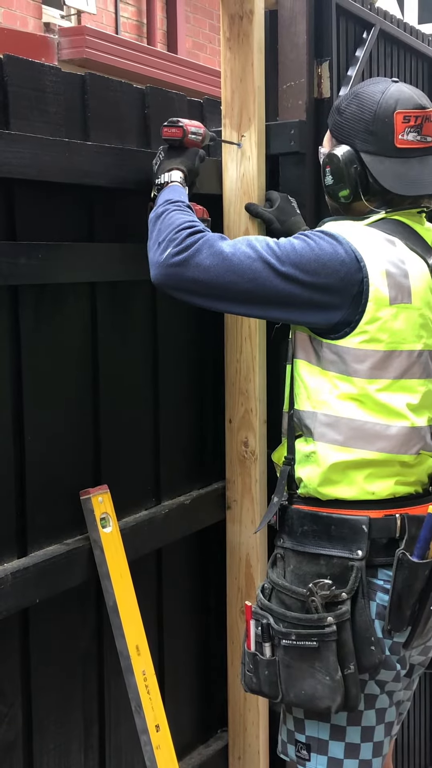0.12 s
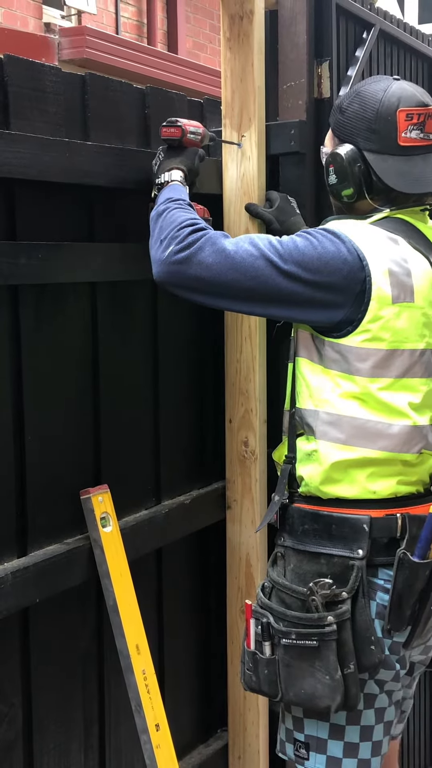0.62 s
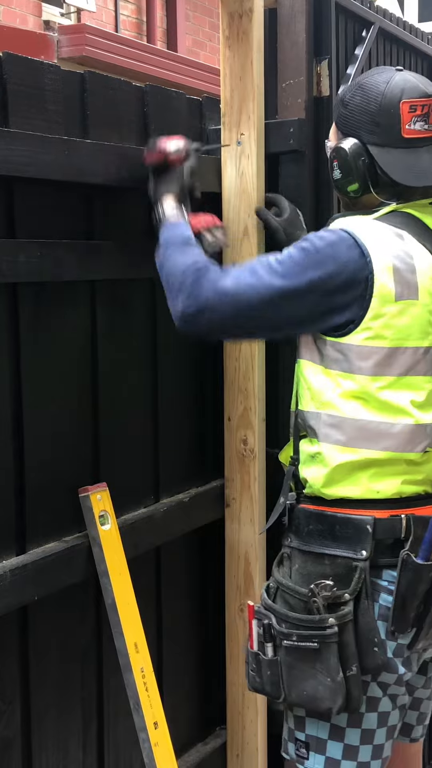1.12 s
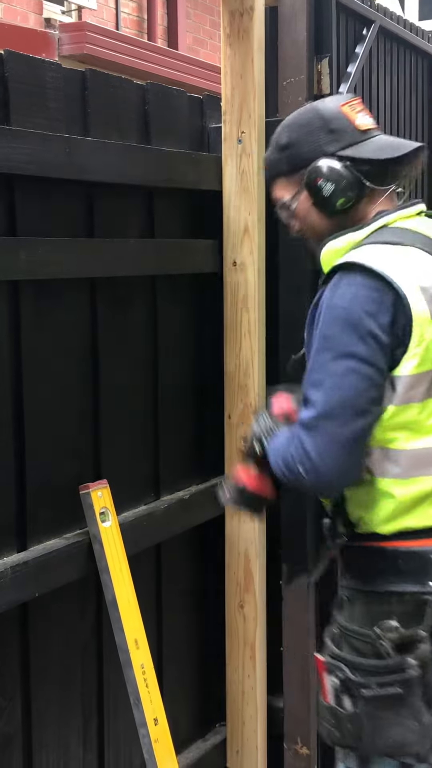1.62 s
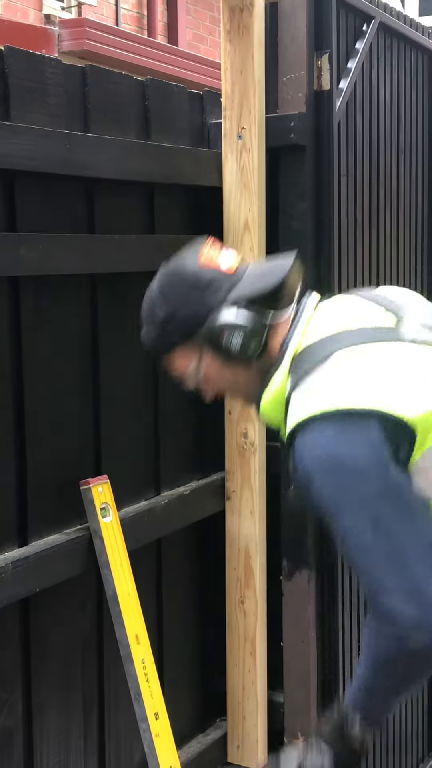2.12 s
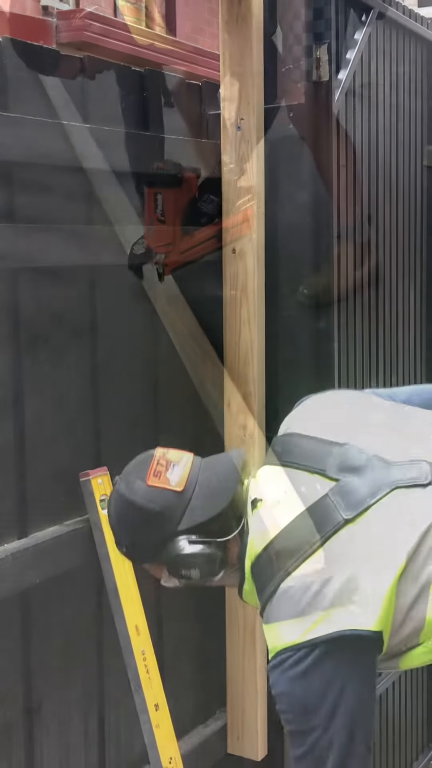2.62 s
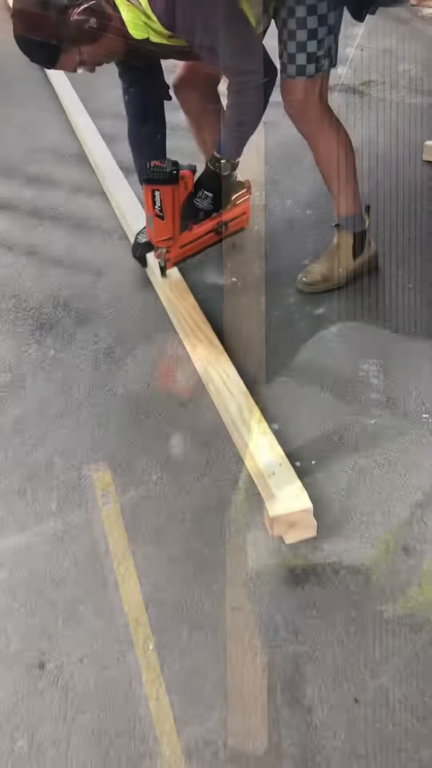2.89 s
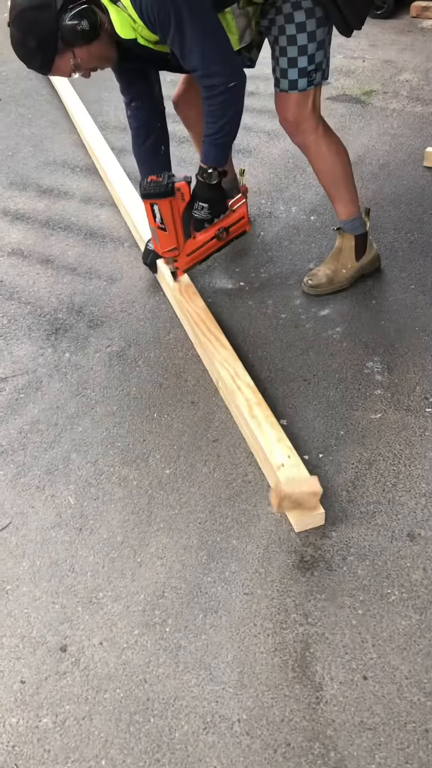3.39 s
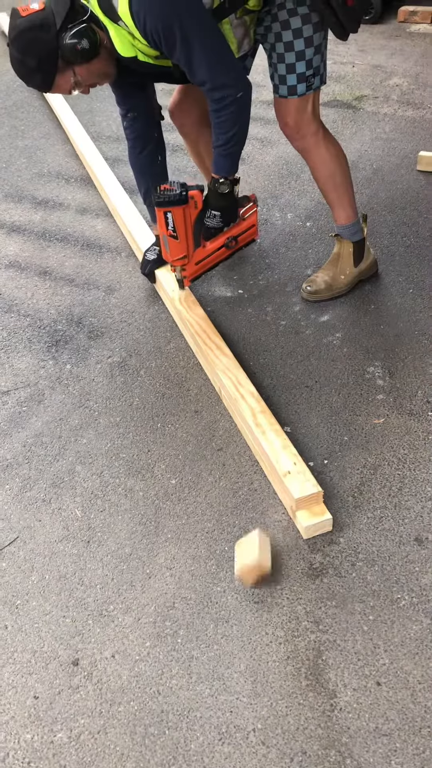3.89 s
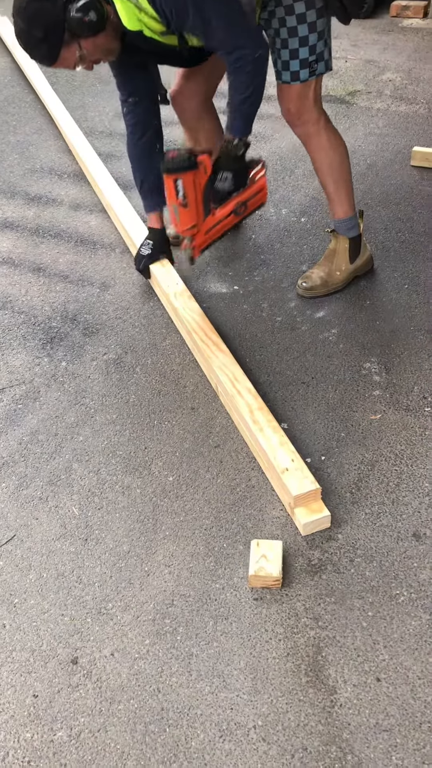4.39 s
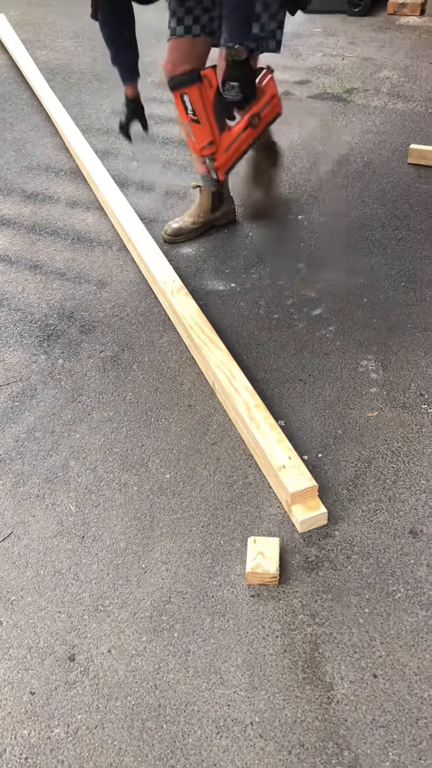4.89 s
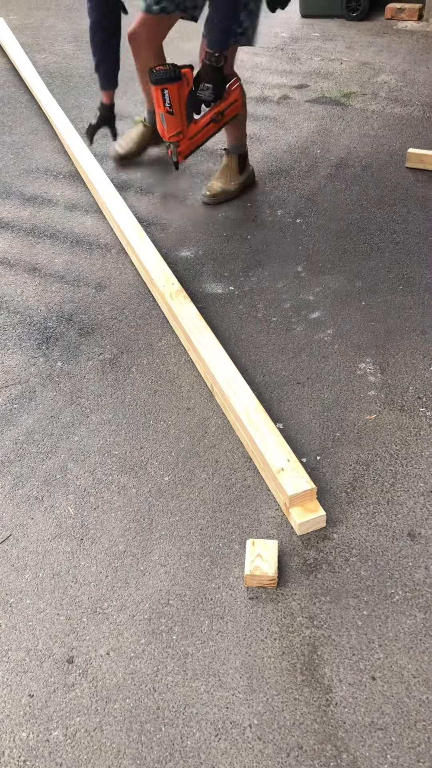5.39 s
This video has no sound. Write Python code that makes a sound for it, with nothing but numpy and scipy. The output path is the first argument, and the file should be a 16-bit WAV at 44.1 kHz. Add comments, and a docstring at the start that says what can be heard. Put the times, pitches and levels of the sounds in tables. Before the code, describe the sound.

An impact driver hammers a screw into a fence post and stops; after quiet rustling, a nail gun cracks twice into timber in an echoing yard.

```python
"""In a walled yard, an impact driver hammers a screw into a fence post and stops; wind buffets the microphone.
Tools and clothes click and rustle, then a gas nailer, its fan humming, fires twice into timber on
concrete and an offcut tumbles off. Blows are shaped noise and dying tones, the post is tones at multiples
of the blow rate, air and wind are colored noise. The yard adds echoes and a limiter flattens the shots."""
import sys
import numpy as np
from scipy import signal
from scipy.fft import rfft, irfft
from scipy.io import wavfile
from scipy.ndimage import uniform_filter1d

SR = 44100
rng = np.random.default_rng(int(sys.argv[2]) if len(sys.argv) > 2 else 0)


def store_pcm(level_fs):
    """Save levels as 16-bit WAV."""
    pcm = np.round(np.clip(level_fs, -1, 1) * 32767).astype(np.int16)
    wavfile.write(sys.argv[1], SR, np.atleast_2d(pcm).T)


def ratio_of_db(decibels):
    """Turn decibels (scalar or array-like) into linear amplitude factors; 0 dB maps to 1."""
    return 10 ** (np.asarray(decibels, float) / 20)


N = 243500  # length in samples

# Color of the quiet yard. Each row: frequency in Hz, relative level in dB per Hz.
AIR_COLOR = [(88, -44), (150, -3.5), (190, 0.5), (235, -4.5), (297, -0.5), (483, -8.5), (660, -7.5),
             (1380, -14), (1750, -19), (3590, -24), (15800, -37.5)]
AIR_DB = -62
# Strength of the wind on the microphone. Each row: time in seconds, level in dB.
WIND_LEVEL = [(0.0, -48), (0.17, -53), (0.28, -36), (0.38, -49.5), (0.43, -37), (0.52, -54.5), (1.77, -59),
              (2.89, -51.5), (2.94, -35.5), (3.01, -44.5), (3.2, -37), (3.34, -39), (3.55, -46),
              (3.89, -48), (4.44, -38.5), (4.54, -42.5), (4.58, -27), (4.72, -31.5), (4.8, -36.5),
              (5.03, -39.5), (5.52, -56)]
# Color of the wind's rumble. Each row: frequency in Hz, relative level in dB per Hz.
RUMBLE_COLOR = [(15, -43), (28, -15.5), (50, 4.5), (82, -2.5), (216, -21), (356, -36.5), (400, -37),
                (520, -56), (880, -120)]
# Color of the rough, higher flutter in strong gusts. Each row: frequency in Hz, relative level in dB per Hz.
FLUTTER_COLOR = [(40, -45.5), (90, 7.5), (150, -13), (300, -19), (600, -74.5)]
# Flutter level at the strongest gust, and dB it changes for each dB of wind.
FLUTTER_DB, FLUTTER_GROWTH = -27.5, 1.82
# How long the yard's echoes last. Each row: frequency in Hz, time to fall by 60 dB in seconds.
YARD_DECAY = [(200, 0.84), (1400, 0.59), (3700, 0.6), (9700, 0.26)]

# Strength of the nailer's fan. Each row: time in seconds, level in dB.
FAN_LEVEL = [(2.5, -55.5), (2.75, -53.5), (3, -57), (3.15, -62), (3.3, -61.5), (4.1, -68), (4.5, -61.5),
             (5, -57.5), (5.52, -56.5)]
# Color of the fan's air noise. Each row: frequency in Hz, relative level in dB per Hz.
FAN_AIR_COLOR = [(200, 3), (320, -7), (440, -0.5), (650, 1.5), (820, -5), (1400, -2), (2200, -7),
                 (2800, -16), (3750, -15.5), (4600, -16.5), (5200, -23), (9500, -29.5), (11000, -57.5)]
# Tones of fan blades and motor. Each row: frequency in Hz, level in dB relative to the air noise.
FAN_TONES = [(662, -8.5), (1324, -11), (1653, -17.5), (1960, -17), (3720, -23)]

# Cloth and boots. Each row: start in seconds, level in dB, length in seconds, center in Hz.
RUSTLES = [(1.545, -70.5, .057, 5000), (2.064, -67.5, 0.13, 4440), (2.157, -66.5, 0.066, 4200),
           (2.336, -65, 0.087, 6170), (3.016, -62, 0.085, 4500), (3.992, -70.5, 0.037, 5030)]
# Small metal parts. Each row: start in seconds, level in dB before a fixed cut, pitch in Hz.
PINGS = [(2.006, -49, 2540), (2.751, -40.5, 3420), (2.935, -50, 8900), (2.935, -54, 11700),
         (3.697, -53, 3520), (3.712, -41, 3330), (4.084, -43, 4940)]
PING_T60, PING_BEAT = 0.05, 0.03  # seconds to fall by 60 dB; share by which the two tones differ
# Plastic and grit. Each row: start in seconds, relative level in dB, center in Hz, seconds to fall by 60 dB.
CLICKS = [(.755, -30, 6030, 0.056), (2.003, -53.5, 7950, 0.043), (2.75, -45, 10000, 0.02),
          (2.754, -46, 7000, 0.02), (2.901, -52, 9000, 0.018), (3.006, -51, 9000, 0.024),
          (3.022, -43, 1290, .03), (3.021, -51.5, 8500, 0.048), (3.34, -41, 3500, .02),
          (3.349, -35, 1400, 0.045), (3.521, -33, 11100, .05), (3.694, -51, 9900, .046),
          (3.786, -50, 3510, 0.023), (3.885, -47, 6840, 0.045), (4.3178, -22, 12500, .032),
          (5.177, -43, 10130, 0.087), (5.194, -47, 12100, .04), (5.379, -52, 3930, 0.072)]
CLICK_SPREAD = 1.1  # filter width as a share of the center
# Ticks of the trigger. Each row: start in seconds, level in dB.
TRIGGER_TICKS = [(4.083, -23), (4.086, -33), (4.092, -30.5), (4.1, -31)]
TRIGGER_HZ, TRIGGER_T60 = 1860, 0.004
# Wood on wood and concrete, and in the first two rows the driver's last blows seating the screw. Each row:
# start in seconds, level in dB, pitch in Hz, seconds to fall by 60 dB.
KNOCKS = [(.730, -36, 690, 0.026), (0.756, -34, 462, 0.037), (3.5214, -20, 477, 0.0094),
          (3.909, -38.5, 1010, 0.012), (3.926, -47, 1160, 0.015), (4.311, -16.5, 476, 0.0068),
          (5.18, -37.5, 600, 0.026), (5.198, -42, 800, 0.03)]
BOUNCE_S, BOUNCE_DB = 0.0034, 1  # a knocked piece lands again: delay, and level relative to the first

# Natural tones of post and fence. Each row: frequency in Hz, relative level in dB.
POST_MODES = [(85, -11), (165, -2), (211, 3.5), (338, -5.5), (590, -4.5), (720, -6), (846, -4), (931, 3.5),
              (1092, 6.5), (1185, 3), (1262, 3)]
POST_DB, POST_T60, POST_WIDTH_HZ = -42, 0.41, 17.8
# Resonances of anvil and case. Each row: frequency in Hz, filter width in Hz, relative level in dB.
ANVIL_MODES = [(1150, 100, 0), (2010, 95, -6), (2322, 125, -2.5), (2670, 120, -8.5), (3066, 140, -10.5),
               (3514, 230, -3), (3844, 68, -5.5), (5360, 2800, -3), (7300, 140, -5.5), (8210, 1640, 1.5)]
# Color of motor and gear noise. Each row: frequency in Hz, relative level in dB per Hz.
GEAR_COLOR = [(88, -26), (150, -8), (213, -8), (398, -16.5), (1080, 4), (1790, -2.5), (8230, -10.5),
              (16000, -18.5)]
# Load on the driver, which is off after the last row. Each row: time in seconds, gain in dB.
DRIVER_LOAD = [(0, -41), (.77, -42), (.83, -52)]
BLOWS_PER_S, FIRST_S, LAST_S = 42.32, 0.0006, 0.7565  # blow rate, first and last blow in seconds

# Nailer shots. Each row: start in seconds, strength in dB.
SHOTS = [(3.3601, -8.5), (4.1090, -10)]
# Parts of a shot. Each row: dB relative to its strength, center in Hz, filter width in Hz,
# seconds to fall by 60 dB.
SHOT_PARTS = [(-6, 12500, 5000, 0.034), (-15.5, 1100, 3900, 0.0694), (-12, 450, 500, 0.03),
              (-3, 2570, 5200, 0.022), (-14, 3000, 5500, .014), (-19, 14000, 5000, .02),
              (-17, 8600, 7100, 0.038)]
# Delay of each part after the start of the shot, one value per part, in seconds.
SHOT_DELAYS_S = [0, .001, .002, .0035, .0185, .081, .090]
# Nose of the nailer. Each row: frequency in Hz, dB relative to the shot, seconds to fall by 60 dB.
NOSE_MODES = [(1735, -7.5, 0.0098), (3160, -16, 0.026)]
# Whistle before the shot: pitch, final level in dB relative to the shot, length.
IGNITE_HZ, IGNITE_DB, IGNITE_S = 3110, -34, 0.01
# Boom of the struck timber as the yard returns it. Each row: frequency in Hz, relative level in dB per Hz.
BOOM_COLOR = [(59, -40.5), (100, -0.5), (481, 6.5), (1450, -3.5), (1580, 8.5), (1910, -5.5), (3120, -6),
              (6990, -19.5), (11600, -24), (16000, -102)]
SWELL_S = 0.048  # the boom builds up this long


def evened(x):
    """Scales a sound to an rms of 1."""
    return x / np.sqrt(np.mean(x ** 2) + 1e-20)


def read(points, hz):
    """Reads a frequency table along a logarithmic pitch scale."""
    f, value = np.transpose(points)
    return np.interp(np.log(hz + 1), np.log(f + 1), value)


def curve(points):
    """Reads a time table at every sample."""
    return np.interp(np.arange(N) / SR, *np.transpose(points))


def add(mix, s, sound):
    """Mixes a sound in at time s, in seconds."""
    part = mix[round(s * SR):][:len(sound)]
    part += sound[:len(part)]


def noise(points, size=N):
    """Steady noise with the color of a table and an rms of 1."""
    hz = np.fft.rfftfreq(size, 1 / SR)
    spectrum = rfft(rng.standard_normal(size)) * ratio_of_db(read(points, hz))
    return evened(irfft(spectrum, size))


def band(x, hz, width):
    """One resonance that keeps its center frequency at full strength."""
    turn = np.exp(2j * np.pi * hz * np.arange(len(x)) / SR)
    r = np.exp(-np.pi * abs(width) / SR)
    # shift the center down to zero, smooth, and shift it back
    return 2 * (turn * signal.lfilter([1 - r], [1, -r], x / turn)).real


def twice_banded(x, hz, width):
    """Two equal resonances in a row, scaled to an rms of 1."""
    return evened(band(band(x, hz, width), hz, width))


def wobble(size):
    """Smooth random drift with an rms of 1; a larger size in samples is slower."""
    return evened(uniform_filter1d(uniform_filter1d(rng.standard_normal(N), size), size))


def burst(db, hz, width, t60):
    """A puff of band noise with a quick rise and a dying tail."""
    t = np.arange(SR // 8) / SR
    puff = twice_banded(rng.standard_normal(len(t)), hz, width)
    return 0.5 * ratio_of_db(db - 60 * t / abs(t60)) * np.minimum(t / 0.00013, 1) * puff


def ring(db, hz, t60):
    """One struck tone that starts quickly and dies away."""
    t = np.arange(SR // 8) / SR
    return ratio_of_db(db - 60 * t / abs(t60)) * np.sin(2 * np.pi * hz * t) * np.minimum(t / 0.00033, 1)


def quiet_air():
    """Steady background noise of the yard, drifting very slightly in level."""
    return ratio_of_db(AIR_DB + 0.14 * wobble(size=6000)) * noise(AIR_COLOR)


def wind():
    """Low rumble in lumps, with a higher flutter that grows faster than the gusts."""
    level_db = curve(WIND_LEVEL) + 1.25 * wobble(size=500)
    flutter_db = FLUTTER_DB + FLUTTER_GROWTH * (level_db - level_db.max())
    return ratio_of_db(level_db) * noise(RUMBLE_COLOR) + ratio_of_db(flutter_db) * noise(FLUTTER_COLOR)


def yard(x):
    """Diffuse echoes: the power of each band lingers and dies at its own speed, with ever new phases."""
    hz, t, z = signal.stft(x, SR, nperseg=256, noverlap=192)
    power = uniform_filter1d(abs(z) ** 2, size=5, axis=0)
    keep = ratio_of_db(-2 * 60 * t[1] / read(YARD_DECAY, hz))  # share of power left after one step
    # the first echo needs a few milliseconds to come back
    lingering = np.array([signal.lfilter([0, 0, 0, 1 - r], [1, -r], p) for r, p in zip(keep, power)])
    chance = rng.standard_normal(z.shape[::-1] + (2,)).T
    echoes = np.sqrt(abs(lingering)) * (chance[0] + 1j * chance[1])
    return signal.istft(echoes, SR, nperseg=256, noverlap=192)[1][:N]


def fan():
    """The nailer's fan: air noise, wavering tones, and narrow noise from air chopped by the blades."""
    t = np.arange(N) / SR
    drift = np.cumsum(1 + 0.00573 * wobble(size=1500)) / SR  # time that runs a little fast or slow
    tones = np.zeros(N)
    for hz, db in FAN_TONES:
        tones += ratio_of_db(db + 2.2 * wobble(size=1200)) * np.sin(2 * np.pi * hz * drift)
        tones += ratio_of_db(db - 5.5) * evened(band(rng.standard_normal(N), hz, 90.0))
    switch_on = np.clip((t - FAN_LEVEL[0][0]) / 0.0043, 0, 1)
    return ratio_of_db(curve(FAN_LEVEL)) * (noise(FAN_AIR_COLOR) + tones) * switch_on


def rustles():
    """Cloth and boots rub: band noise that swells and fades."""
    out = np.zeros(N)
    for s, db, length, hz in RUSTLES:
        grains = rng.standard_normal(round(length * SR))
        add(out, s, ratio_of_db(db) * evened(band(grains, hz, 0.39 * hz)) * np.hanning(len(grains)))
    return out


def pings():
    """Small metal parts ring with two close tones that beat against each other."""
    out = np.zeros(N)
    for s, db, hz in PINGS:
        add(out, s, ring(db - 8.5, hz, PING_T60))
        add(out, s, ring(db - 12, hz * (1 + PING_BEAT), PING_T60))
    return out


def clicks():
    """Plastic and grit click: short puffs of wide band noise."""
    out = np.zeros(N)
    for s, db, hz, t60 in CLICKS:
        add(out, s, burst(db, hz, CLICK_SPREAD * hz, t60))
    return out


def trigger():
    """The trigger ticks: very short tones of one pitch."""
    out = np.zeros(N)
    for s, db in TRIGGER_TICKS:
        add(out, s, ring(db, TRIGGER_HZ, TRIGGER_T60))
    return out


def knocks():
    """Knocks land twice: a few dying cycles with a rattle on top, then a lower second tone."""
    out = np.zeros(N)
    for s, db, hz, t60 in KNOCKS:
        add(out, s, ring(db, hz, t60) + burst(db - 4, 1.6 * hz, 1.3 * hz, t60))
        add(out, s + BOUNCE_S, ring(db + BOUNCE_DB, 0.7 * hz, t60))
    return out


def blow_count():
    """Counts the blows at every sample; the fraction is progress toward the next blow."""
    return BLOWS_PER_S * (np.arange(N) / SR - FIRST_S) + 1


def post():
    """Regular blows drive the post at multiples of their rate; it rings on after the last blow."""
    t = np.arange(N) / SR
    mode_hz, mode_db = np.transpose(POST_MODES)
    uneven = blow_count() + 0.12 + 0.005 * wobble(size=1500)  # blows come a little early or late
    # all modes start together at the blow, so the tones throb in step with it
    tones = np.zeros(N)
    for k in range(1, 33):
        off_pitch = (k * BLOWS_PER_S - mode_hz) / POST_WIDTH_HZ
        gain = np.sum(ratio_of_db(mode_db) / (1 + 2j * off_pitch))
        tones += ratio_of_db(1.8 * wobble(size=3000)) * (gain * np.exp(2j * np.pi * k * uneven)).imag
    return ratio_of_db(POST_DB - 60 * np.maximum(t - LAST_S, 0) / POST_T60) * evened(tones)


def driver():
    """Steel cracks at each blow and rattles between blows, ringing the anvil and case over gear noise."""
    t = np.arange(N) / SR
    turns = blow_count()
    blow = turns.astype(int)
    strength = ratio_of_db(1.3 * rng.standard_normal(300))[blow] * (t < LAST_S + 0.02)
    since = (turns % 1) / BLOWS_PER_S  # seconds since the last blow
    slip = 6 * rng.random(300)[blow]  # samples by which a blow lands early, blurring the highest lines
    # blows are much alike, so their ringing falls on multiples of the blow rate
    alike = rng.standard_normal(SR // 20)[(since * SR + slip).astype(int)]
    grain = 2.7 * alike + 0.72 * rng.standard_normal(N)
    crack = strength * ratio_of_db(-60 * since / 0.022) * np.minimum(since / 0.0016, 1) * grain
    # then the hammer grinds back up its cam until the next blow
    climb = np.clip((since - 0.011) / 0.008, 0, 1)
    loose = 0.039 * ratio_of_db(7.3 * np.clip(wobble(size=150), -2, 1.5)) * rng.standard_normal(N)
    rattle = crack + 0.39 * strength * climb * grain + loose
    # the grip on the screw shifts, and with it the strength of each resonance
    steel = np.zeros(N)
    for hz, width, db in ANVIL_MODES:
        steel += ratio_of_db(db + 4.3 * wobble(size=3500)) * twice_banded(rattle, hz, width)
    # random signs keep the bright fizz from ever repeating
    fizz = abs(crack + 0.11 * climb * grain) * rng.choice([-1., 1.], N)
    bright = twice_banded(fizz, 24000, 24000)
    works = ratio_of_db(-7) * evened(steel) + ratio_of_db(-4.0) * bright + ratio_of_db(-1) * noise(GEAR_COLOR)
    running = t < DRIVER_LOAD[-1][0]
    return ratio_of_db(curve(DRIVER_LOAD)) * works * running


def timber_boom():
    """The struck timber's boom, low noise that swells and then dies; it feeds the yard's echoes."""
    out = np.zeros(N)
    t = np.arange(SR // 4) / SR
    swell = np.minimum(t / SWELL_S, 1) ** 0.55
    for s, db in SHOTS:
        level = ratio_of_db(db - 12.0 - 60 * np.maximum(t - SWELL_S, 0) / 0.11)
        add(out, s, level * swell * noise(BOOM_COLOR, size=len(t)))
    return out


def nailer():
    """Gas catches with a swelling whistle, noise bursts crack, and the nose rings as the blade lands."""
    out = np.zeros(N)
    u = np.arange(0, IGNITE_S, 1 / SR)
    whistle = u / IGNITE_S * np.sin(2 * np.pi * IGNITE_HZ * u)
    for s, db in SHOTS:
        add(out, s - IGNITE_S, ratio_of_db(db + IGNITE_DB) * whistle)
        for delay, (part_db, hz, width, t60) in zip(SHOT_DELAYS_S, SHOT_PARTS):
            add(out, s + delay, burst(db + part_db, hz, width, t60))
        for hz, mode_db, t60 in NOSE_MODES:
            add(out, s + SHOT_DELAYS_S[3], ring(db + mode_db, hz, t60))
    return out


def scene():
    """Adds all sources, near and through the yard."""
    works = driver()
    shots = nailer()
    small = rustles() + pings() + clicks() + trigger() + knocks()
    near = works + shots + small
    far = yard(ratio_of_db(-7.5) * works + ratio_of_db(-1) * shots + ratio_of_db(-1.5) * small + timber_boom())
    far *= ratio_of_db(1.3 * wobble(size=120))  # echoes arrive in clumps
    return (near + far + post() + fan() + quiet_air() + wind())[None]


def low_pass(x):
    """Removes everything above the highest recorded frequency."""
    return signal.sosfilt(signal.butter(12, 16870, fs=SR, output="sos"), x)


def record(dry):
    """A limiter that listens above the wind holds loud sounds down and lets go quickly."""
    heard = signal.sosfilt(signal.butter(2, 200, "high", fs=SR, output="sos"), dry[0])
    power_db = 10 * np.log10(abs(uniform_filter1d(heard ** 2, size=200)) + 1e-12)
    fall = np.arange(N) * 60.0 / SR  # the held peak falls by 60 dB a second
    peak_db = np.maximum.accumulate(power_db + fall) - fall
    over_db = np.maximum(peak_db + 24.0, 0)  # dB above the threshold of -24 dB
    late_db = signal.lfilter(np.ones(200) / 200, 1, over_db)  # it acts a few milliseconds late
    held = dry / ratio_of_db(0.82 * late_db)
    # cut the highest treble
    finished = signal.oaconvolve(held, signal.firwin(1023, 15980, fs=SR)[None], "same")
    return low_pass(finished)


dry = scene()
out = record(dry)
store_pcm(out)
```